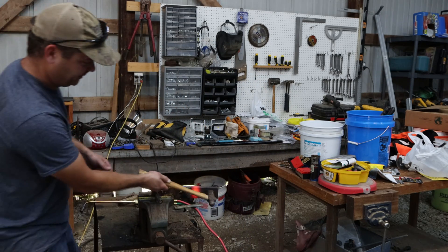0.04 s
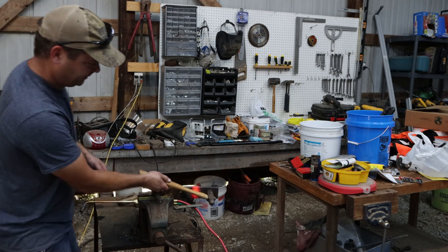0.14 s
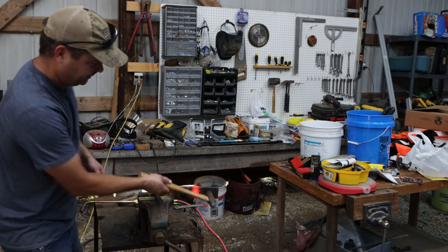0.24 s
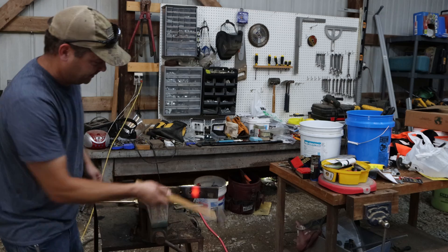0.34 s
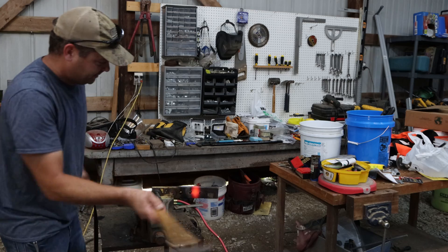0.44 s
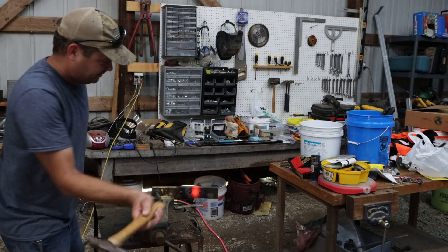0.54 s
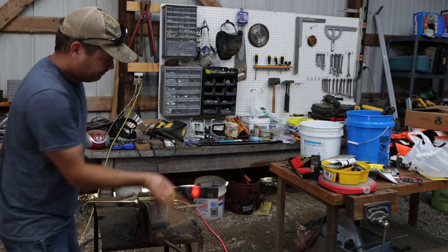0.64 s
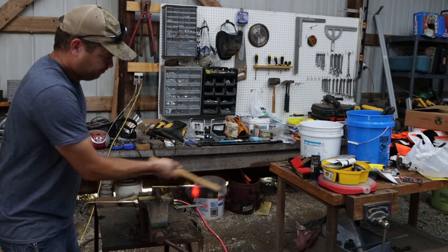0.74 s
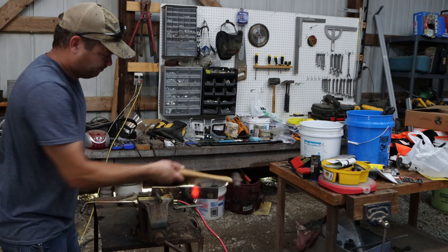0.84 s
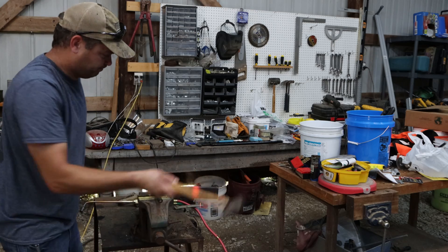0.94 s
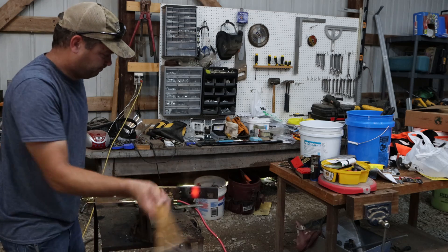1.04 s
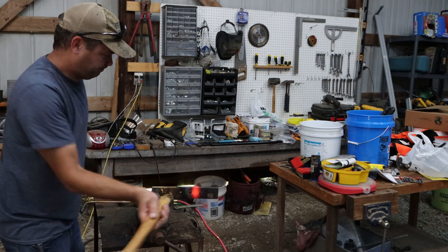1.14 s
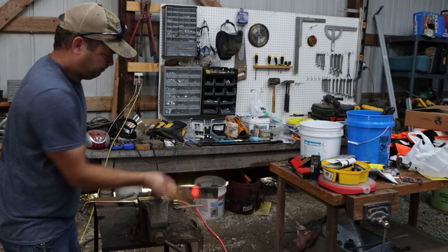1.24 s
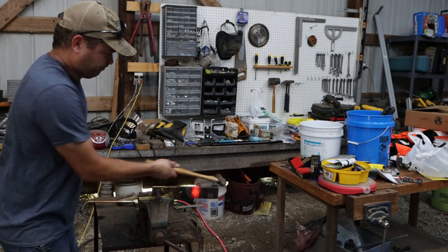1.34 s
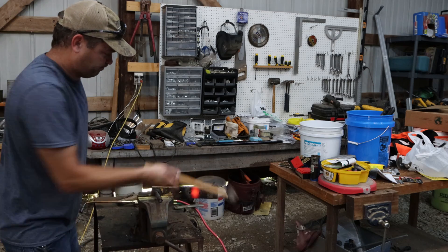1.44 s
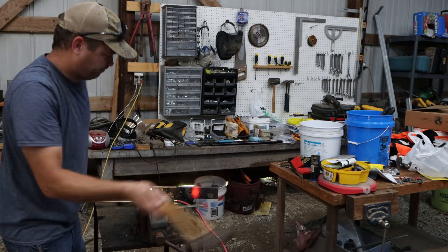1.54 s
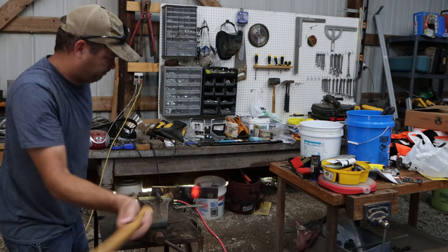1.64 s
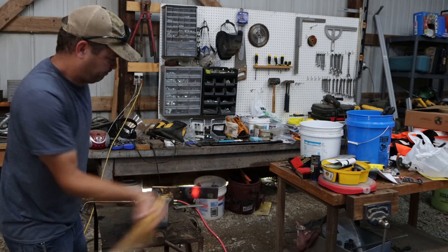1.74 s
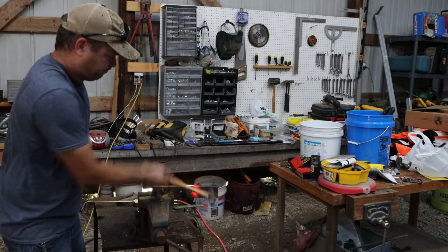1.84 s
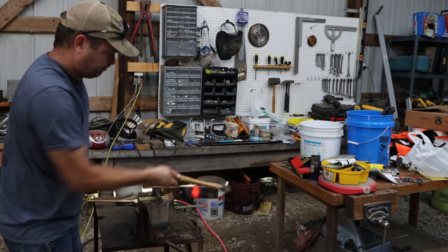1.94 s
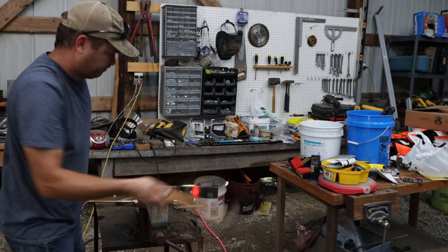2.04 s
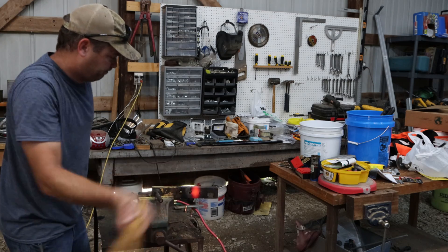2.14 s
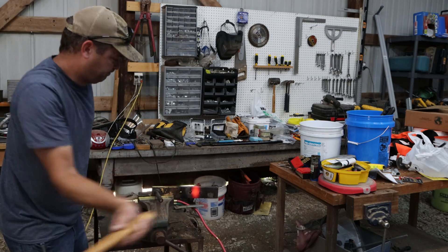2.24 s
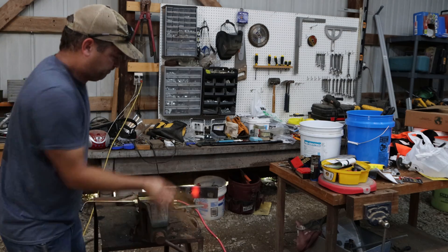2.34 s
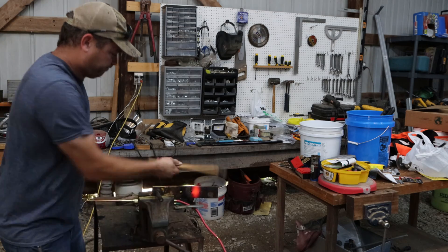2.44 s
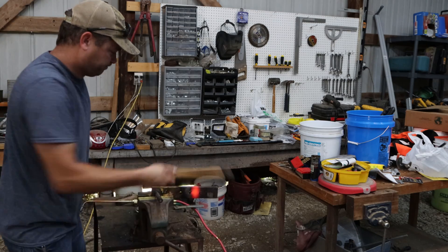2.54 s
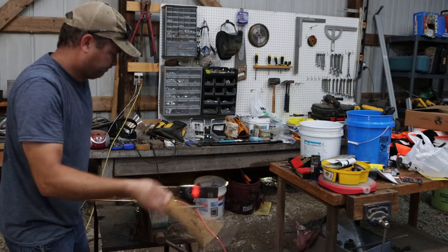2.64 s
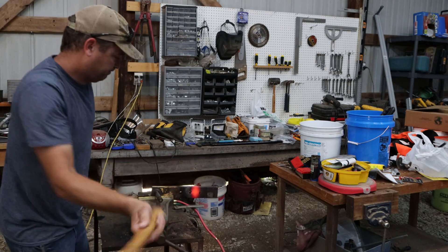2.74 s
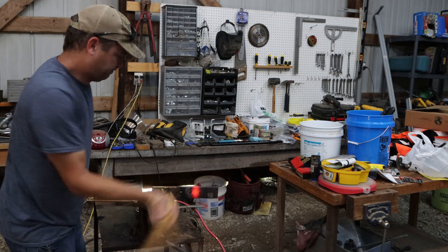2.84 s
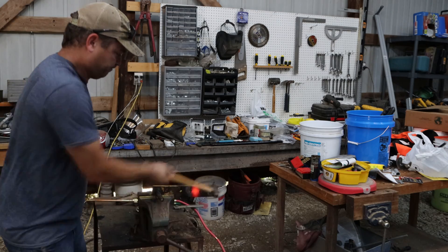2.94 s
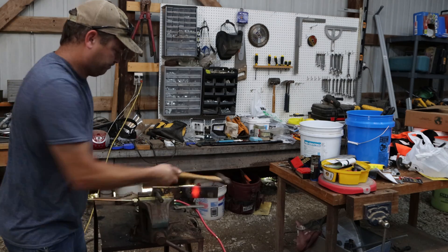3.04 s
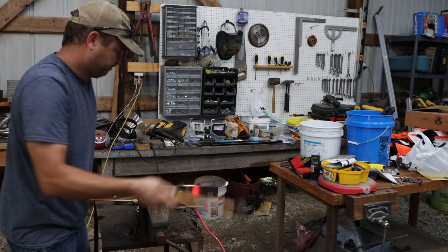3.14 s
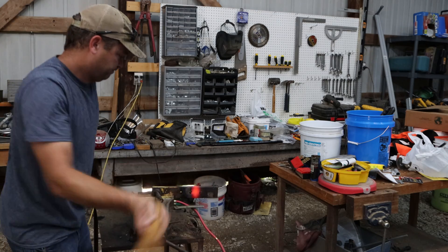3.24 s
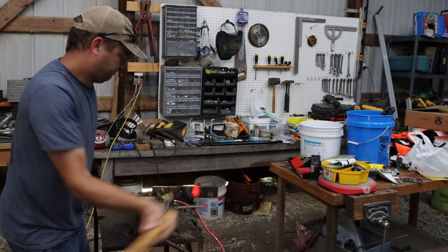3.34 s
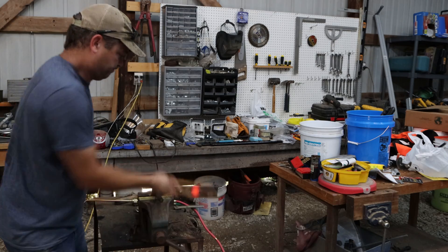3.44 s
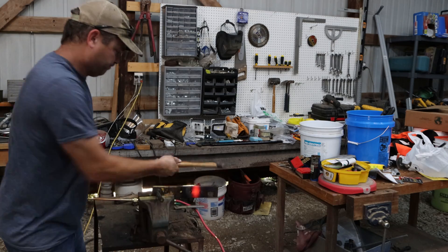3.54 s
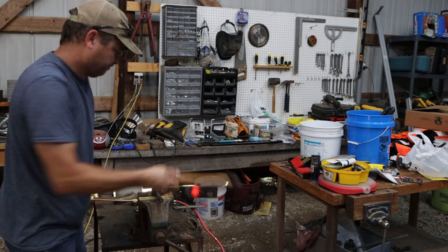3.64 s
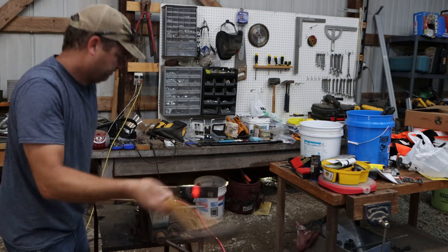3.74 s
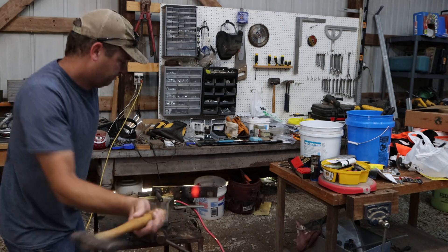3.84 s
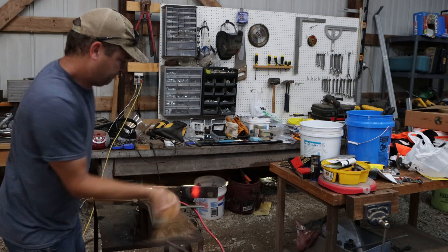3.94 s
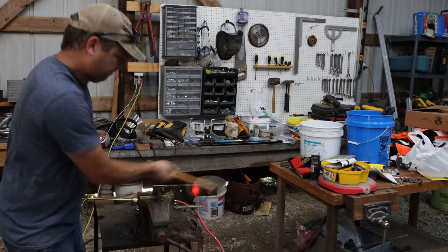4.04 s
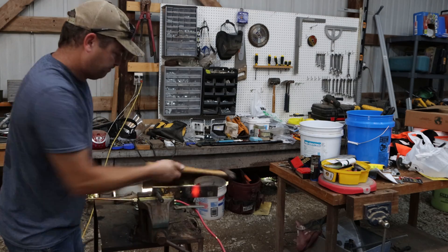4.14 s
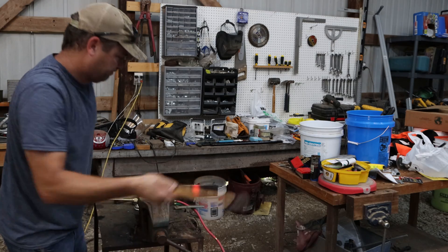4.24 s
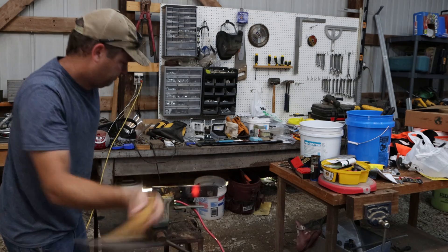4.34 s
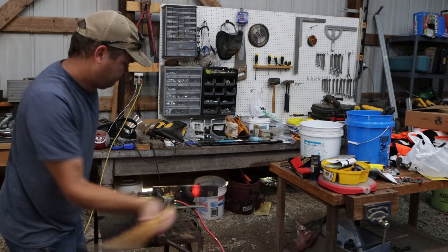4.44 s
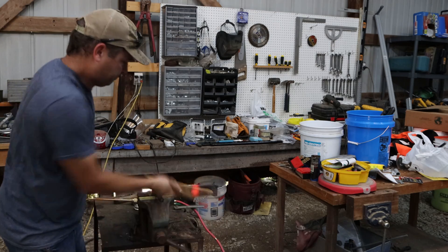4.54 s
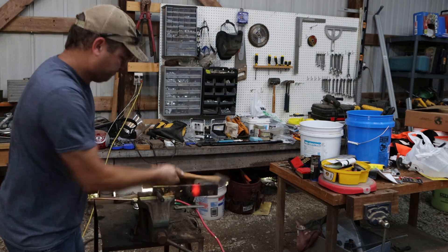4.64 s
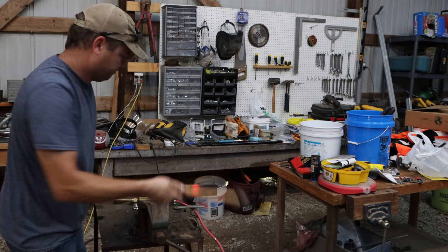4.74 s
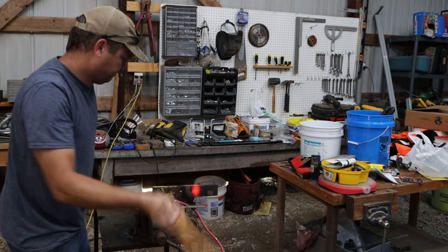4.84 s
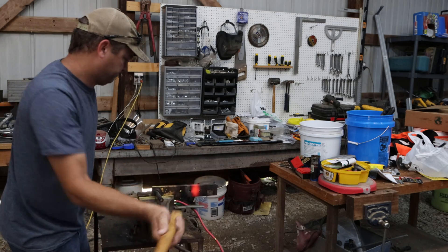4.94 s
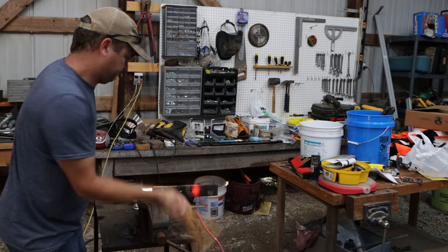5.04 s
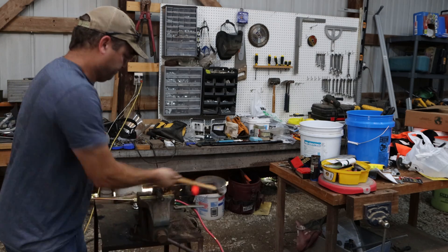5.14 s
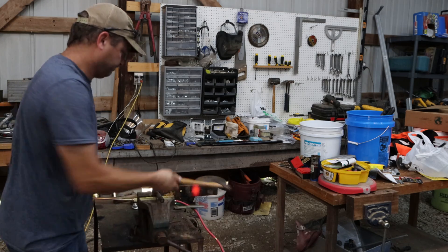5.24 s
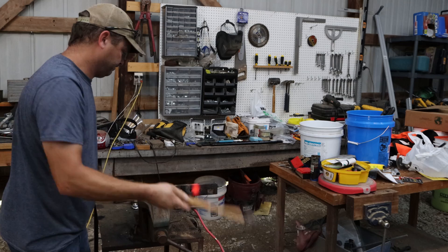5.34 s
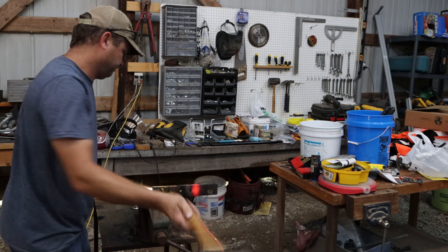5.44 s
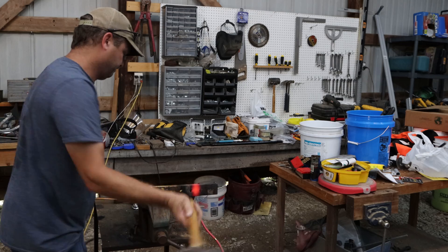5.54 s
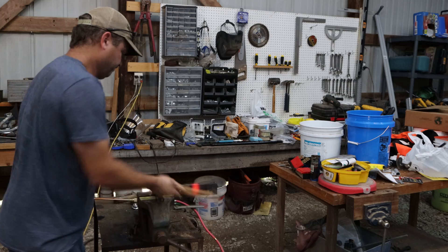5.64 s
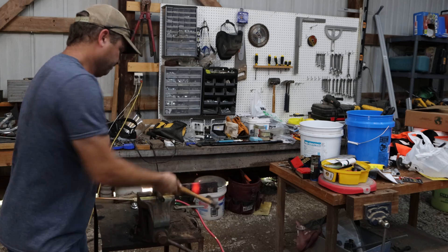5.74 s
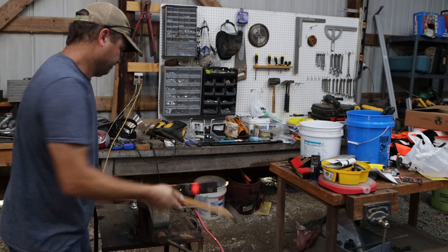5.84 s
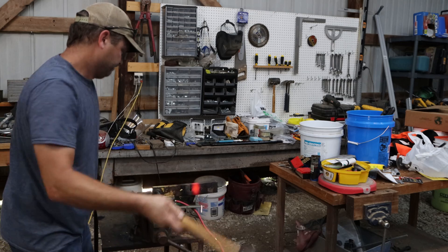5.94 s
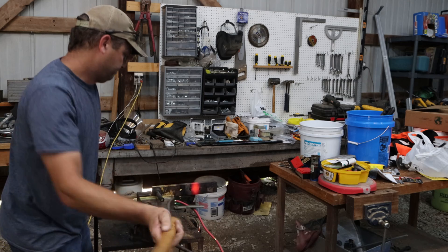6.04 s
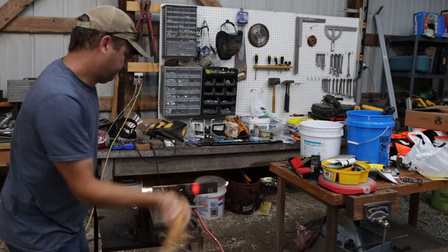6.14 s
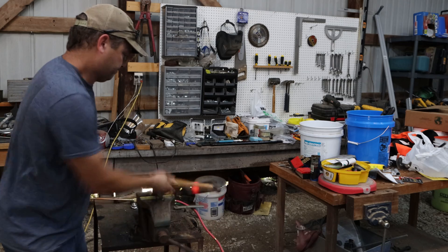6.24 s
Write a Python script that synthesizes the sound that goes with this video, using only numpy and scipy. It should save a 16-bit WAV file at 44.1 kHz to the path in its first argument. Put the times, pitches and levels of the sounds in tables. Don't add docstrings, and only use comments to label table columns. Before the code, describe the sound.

A large sheet-metal workshop has a quiet, low, steady murmur, with the tail of a clatter and small ticks at the very start. At 0.25 s a hammer lightly taps a steel bar in a vise, a soft short clink, followed by faint scuffs. Ten loud blows then fall evenly about 0.55 s apart, at 0.84, 1.42, 1.98, 2.52, 3.07, 3.6, 4.16, 4.7, 5.25 and 5.8 s. Each is a hard, dense crack with a brief bar-and-vise ring, a little low thud and a hall echo; the first two are duller, later ones vary in brightness. From 1.7 to 1.9 s a loose steel part jingles high and faint while a wooden knock bounces quickly to rest with a low bump. The jingle returns around 4.05 s, and a low bump precedes the 4.7 s blow. The last echo fades into murmur by 6.4 s. The camera microphone's limiter flattens the blows.

```python
import sys
import numpy as np
from scipy import signal
from scipy.fft import rfft, irfft
from scipy.io import wavfile
from scipy.ndimage import map_coordinates

SR = 44100
rng = np.random.default_rng(int(sys.argv[2]) if len(sys.argv) > 2 else 0)


def store_wav(level_fs):
    pcm = np.round(np.clip(np.atleast_2d(level_fs), -1, 1) * 32767)
    wavfile.write(sys.argv[1], SR, pcm.T.astype(np.int16))


def volts_from_db(level):
    exponent = np.asarray(level, float) / 20
    return 10 ** exponent


N = 277830
CLICK = np.arange(SR // 2) == 0


def unit(x):
    return x / np.sqrt(np.mean(x ** 2) + 1e-20)


def along(points, hz):
    f, v = np.transpose(points)
    return np.interp(np.log(hz + 1), np.log(f + 1), v)


def coloured(x, points):
    hz = np.fft.rfftfreq(4096, 1 / SR)
    cepstrum = irfft(np.log(volts_from_db(along(points, hz)) + 1e-6))
    cepstrum[1:2048] *= 2
    cepstrum[2049:] = 0
    response = irfft(np.exp(rfft(cepstrum)))
    return signal.fftconvolve(x, response)[:len(x)]


def ring(modes, scatter_db, detune, attack):
    t = np.arange(SR // 2) / SR
    hz, db, t60 = np.transpose(modes)[..., None]
    luck = np.clip(rng.standard_normal((2, len(modes), 1)), -1.3, 1.3)
    level = volts_from_db(db + scatter_db * luck[0] - 60 * t / t60)
    sines = level * np.sin(2 * np.pi * hz * (1 + detune * luck[1]) * t)
    return sines.sum(axis=0) * (1 - np.exp(-t / attack))


def puff(t60):
    fade = volts_from_db(-60 * np.arange(SR // 2) / SR / t60)
    return fade * rng.standard_normal(SR // 2)


# pitch_hz, t60_s (time to fall 60 dB)
HALL_DECAY = [(120, 0.68), (300, 0.94), (1000, 0.81), (2500, 0.75), (5000, 0.67), (9000, 0.62),
              (12000, 0.4), (16000, 0.52)]
# pitch_hz, level_db
SHEET_WALLS = [(30, -26), (90, -4.5), (140, 4.5), (220, -3), (16000, -2.5)]


def hall(direct, feed, wet_db):
    span = SR * 3 // 2
    hz, t, z = signal.stft(rng.standard_normal(span), SR, nperseg=256)
    fade = volts_from_db(-60 * t / along(HALL_DECAY, hz)[:, None])
    tail = signal.istft(z * fade, SR, nperseg=256)[1][:span]
    swell = 1 - np.exp(-np.arange(span) / SR / 0.00057)
    tail = coloured(tail * swell, SHEET_WALLS)
    wet = signal.fftconvolve(feed, tail / np.linalg.norm(tail))[:span]
    return volts_from_db(wet_db) * wet + np.pad(direct, (0, span - len(direct)))


def strike(modes, crack, crack_db, t60, wet_db):
    burst = puff(t60)
    spread = .98 * np.linalg.norm(burst) * CLICK + .18 * puff(t60)
    direct = modes + volts_from_db(crack_db) * coloured(burst, crack)
    feed = modes + volts_from_db(crack_db) * coloured(spread, crack)
    return hall(direct, feed, wet_db)


def add(track, s, sound):
    part = track[round(s * SR):][:len(sound)]
    part += sound[:len(part)]


# pitch_hz, level_db (per Hz)
MURMUR = [(20, -23), (40, 6.5), (70, -3), (130, -3), (300, -7), (800, -12), (1600, -19.5), (3000, -28),
          (5000, -34), (8000, -30.5), (11000, -46), (16000, -41)]


def shop_air():
    t = np.arange(N) / SR
    breathing_db = 0.44 * map_coordinates(rng.standard_normal(60), [t * 8])
    clatter_db = 7.5 * np.clip(1 - t / 0.08, 0, 1)
    rising_db = 0.2 * t
    level_db = -54.5 + clatter_db + rising_db + breathing_db
    return volts_from_db(level_db) * unit(coloured(rng.standard_normal(N), MURMUR))


# start_s, level_db, pitch_hz (centre), t60_s
SMALL_NOISES = [
    (.004, -48, 1800, 0.061),
    (.016, -50, 8700, 0.026),
    (0.204, -58, 7000, 0.017),
    (.667, -57, 10000, .01),
    (.832, -34, 895, 0.011),
    (1.33, -57, 13500, 0.01),
    (3.585, -50, 5000, 0.0092),
    (4.665, -20.5, 800, 0.095),
    (4.668, -29, 2670, 0.022),
    (5.2, -64, 7000, 0.009),
                (.209, -31, 700, .03),
    (.562, -39, 6000, .005),
    (.677, -28, 700, .03),
    (1.887, -4, 350, .06),
    (.674, -60, 7400, .35),
    (1.29, -60, 12000, .02),
    (3.515, -55, 13000, .01),
    (4.56, -55, 13000, .01),
    (6.272, -53, 12500, .01),
]


def ticks_and_bumps():
    out = np.zeros(N)
    for s, db, hz, t60 in SMALL_NOISES:
        band = [(hz / 5, -50), (hz / 1.6, -4), (hz, 0), (hz * 1.6, -4), (hz * 5, -50), (hz * 30, -110)]
        add(out, s, volts_from_db(db) * strike(0, band, crack_db=0, t60=t60, wet_db=-6))
    return out


# start_s, level_db
AIM = [
    (0.253, -15.5),
]
# pitch_hz, level_db, t60_s
AIM_MODES = [(630, -15, .05), (780, -4, .04), (890, -2, .1), (1130, -4, .07), (1235, 2, .07),
             (1572, -14, .06), (1930, -4, .08), (2300, -4, .07), (2573, -12, .05), (3138, -16, .06),
             (3470, -7, .07), (4662, -18, .05), (5180, -5, .04), (7500, -16, .04)]
# pitch_hz, level_db
AIM_CRACK = [(300, -37), (650, 14), (1200, 10), (2500, 10.5), (5000, 3.5), (9000, -10), (15000, -36)]


def aiming_tap():
    out = np.zeros(N)
    contact = [(500, -5), (2000, -1), (4500, 11), (6500, -18), (14000, -34)]
    for s, db in AIM:
        pairs = ring(AIM_MODES + AIM_MODES, scatter_db=1, detune=0.008, attack=0.0034)
        add(out, s, -volts_from_db(db - 8) * strike(pairs, AIM_CRACK, crack_db=6, t60=0.031, wet_db=-4.5))
        add(out, s, -volts_from_db(db + 18.5) * coloured(CLICK, contact))
    return out


# start_s, level_db, hardness_db (of the contact), bar_pitch_hz and head_pitch_hz (woken resonances)
BLOWS = [
    (0.8368, -11.5, -5.5, 1080, 5780),
    (1.4164, -10, -6, 1670, 4160),
    (1.9771, -10, -1, 1780, 6300),
    (2.5207, -10, -3, 1490, 5800),
    (3.067, -9, 1, 350, 7700),
    (3.6008, -8.5, -4.5, 2330, 5630),
    (4.1558, -9, 2, 990, 6600),
    (4.6999, -8.5, 1.5, 4400, 7600),
    (5.2524, -10.5, 3, 960, 7300),
    (5.8021, -7.5, -1, 1130, 5550),
]
# pitch_hz, level_db, t60_s
BAR = [(369.5, -11, 0.11), (943, 0.5, 0.028), (1031, -4.5, 0.14), (1110, -25, 0.11), (1288, -10, 0.18),
       (1540, -15.5, 0.22), (1760, -14, 0.14), (1895, -7, 0.09), (2150, -11, 0.038), (2330, -15, 0.11),
       (2560, -2, 0.025), (2680, -10, 0.06), (3130, -5, 0.014)]
# pitch_hz, level_db (per Hz)
CRACK = [(24, -83), (40, -38), (358, -17), (690, -10), (981, 4), (1400, -2.5), (2200, -5), (3050, -8),
         (11600, -10.5), (12500, -17.5), (15300, -25.5), (16500, -68)]
# pitch_hz, level_db, gain_db (per dB of hardness)
LANDING = [(350, 7, 0.18), (1080, -5.5, 0.24), (2110, 0.5, 0), (5000, -3, 0.76), (10000, -9.5, 1.5)]


def hammer():
    out = np.zeros(N)
    t = np.arange(SR // 8) / SR
    for s, db, hard_db, bar_hz, head_hz in BLOWS:
        modes = volts_from_db(-20) * ring(BAR, scatter_db=5.5, detune=0.0058, attack=0.00017)
        blow = strike(modes, CRACK, crack_db=5.5, t60=0.07, wet_db=6.5)
        landing = [(hz, level_db + gained * hard_db) for hz, level_db, gained in LANDING]
        masked_db = .55 * hard_db
        lifts = [(bar_hz, 4 + 2.5 * np.log2(1000 / bar_hz)),
                 (head_hz, 3 - masked_db),
                 (head_hz * 1.36, 2 - masked_db)]
        humps = []
        for hz, lift_db in lifts:
            humps += [(hz * .93, 0), (hz, np.clip(lift_db, 0, 10)), (hz * 1.07, 0)]
        add(out, s, volts_from_db(db + 11) * coloured(coloured(blow, landing), humps))
        ping = volts_from_db(db + hard_db + 1.5 - 60 * t / 0.015) * np.sin(2 * np.pi * 8400 * t)
        add(out, s, ping)
        thud = volts_from_db(db - 26 + rng.normal(0, 3) - 60 * t / 0.31) * np.sin(2 * np.pi * 45 * t)
        add(out, s, thud)
    return out


# start_s, level_db, lean_db (towards the upper modes, per octave)
JINGLE = [
    (1.715, -46, 3),
    (1.745, -49, -12),
    (1.803, -45, 6),
    (1.887, -48, 4),
    (4.041, -41, 6),
    (4.058, -48, -12),
    (4.100, -47, -10),
    (4.145, -48, 4),
    (4.66, -56, 0),
]
# pitch_hz, level_db, t60_s
LOOSE_PART = [(5300, -16, .08), (6541, -2, .1), (8242, 0, .14), (9800, -22, .05), (12145, -25, .07),
              (12900, -30, .05), (13800, -29, .05)]


def loose_part():
    out = np.zeros(N)
    for s, db, lean_db in JINGLE:
        modes = [(hz, level_db + lean_db * np.log2(hz / 7400), t60) for hz, level_db, t60 in LOOSE_PART]
        jingle = ring(modes, scatter_db=2, detune=.002, attack=.001)
        chatter = np.repeat(rng.uniform(.2, 1, SR // 2 // 150), 150)
        jingle = jingle * chatter
        add(out, s, volts_from_db(db) * hall(jingle, jingle, wet_db=-5))
    return out


# start_s, level_db, brightness_db
KNOCK = (1.8118, -16.5, 5)
# pitch_hz, level_db, t60_s
WOOD = [(227, -8, 0.084), (371, 2.5, 0.076), (565, -10, 0.035), (974, -20, 0.034), (1167, 4.5, 0.019),
        (4240, -7, 0.0092)]


def wooden_knock():
    out = np.zeros(N)
    flat_s = KNOCK[0] + 0.00057
    rebounds = [(flat_s + .0088 * k, -4.5 - 4.5 * k, -11) for k in range(5)]
    for s, db, bright_db in [KNOCK] + rebounds:
        crack = [(60, -59), (130, -7), (250, 4.0), (1200, -1), (4000, bright_db - 2.0), (14000, bright_db - 25.0)]
        modes = 0.46 * ring(WOOD, scatter_db=2.5, detune=0.04, attack=0.002)
        add(out, s, volts_from_db(db) * strike(modes, crack, crack_db=2.5, t60=0.05, wet_db=-6))
    return out


def scene():
    mono = shop_air() + ticks_and_bumps() + aiming_tap() + hammer() + loose_part() + wooden_knock()
    return np.tile(mono, (2, 1))


def squeeze(x, top_db, release, attack):
    keep = np.exp(-1 / (attack * SR))
    level_db = 10 * np.log10(signal.lfilter([1 - keep], [1, -keep], x ** 2) + 1e-12)
    excess_db = np.maximum(level_db - top_db, 1e-3)
    clock = np.arange(N) / SR / release
    drop_db = np.exp(np.maximum.accumulate(np.log(excess_db) + clock) - clock)
    return x * volts_from_db(-drop_db)


def band_limit(x):
    return signal.sosfilt(signal.butter(12, 17000, fs=SR, output="sos"), x)


# pitch_hz, level_db
MIC = [(20, -22), (100, -1), (200, 2.5), (15800, 3.5), (17500, -18)]


def record(dry):
    x = squeeze(coloured(dry[0], MIC), top_db=-9, release=0.076, attack=0.0041)
    ceiling = .68
    x = x / (1 + np.abs(x / ceiling) ** 4) ** (1 / 4)
    treble_limit = [(15700, 0), (16100, -14), (16700, -26), (17200, -90)]
    gain = volts_from_db(along(treble_limit, np.fft.rfftfreq(N, 1 / SR)))
    x = irfft(rfft(x) * gain, N)
    return band_limit(np.tile(x, (2, 1)))


dry = scene()
out = record(dry)
store_wav(out)
```